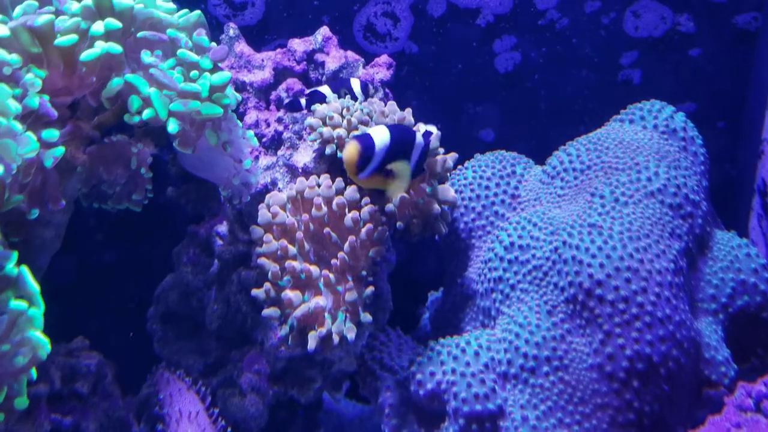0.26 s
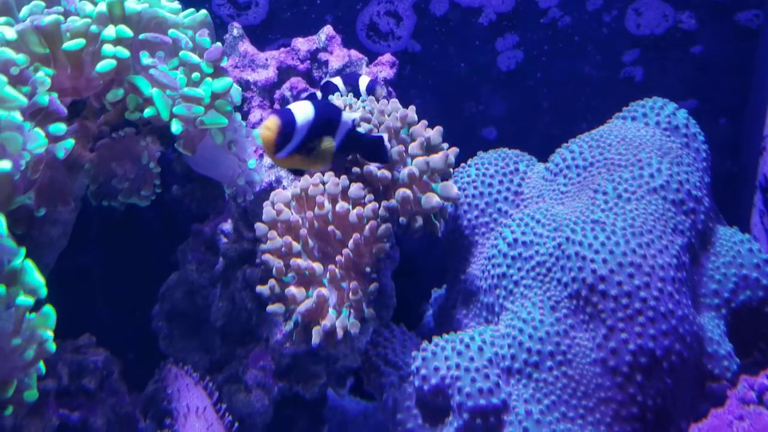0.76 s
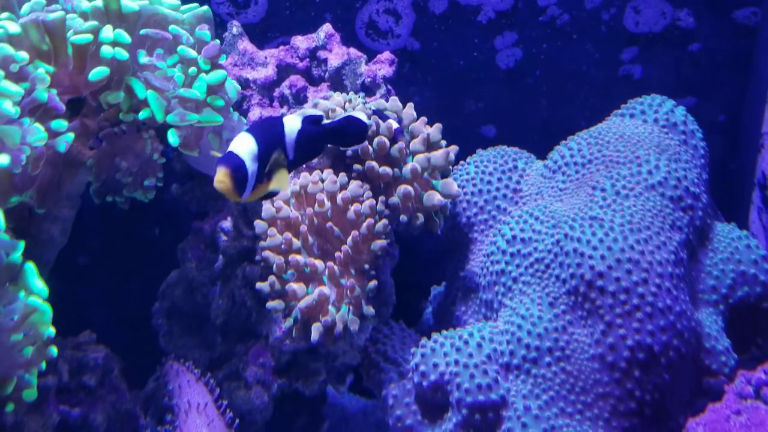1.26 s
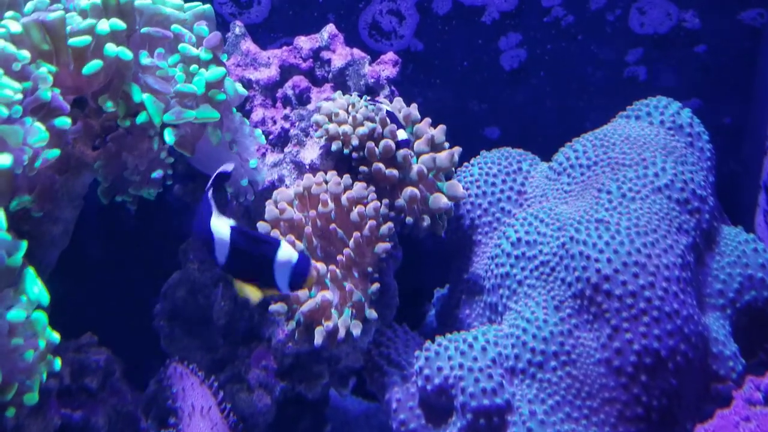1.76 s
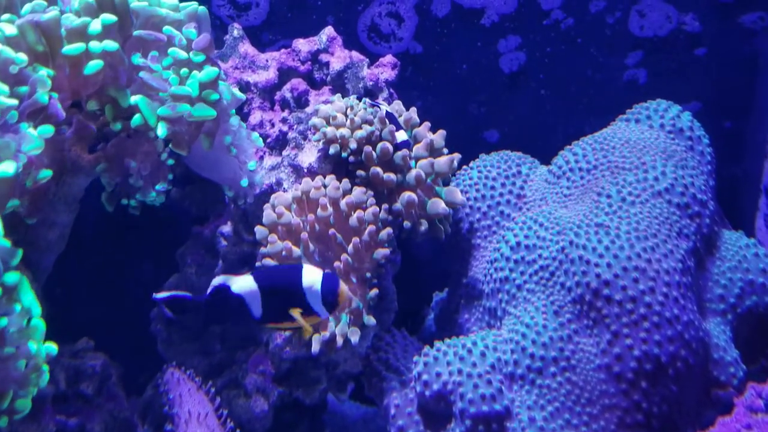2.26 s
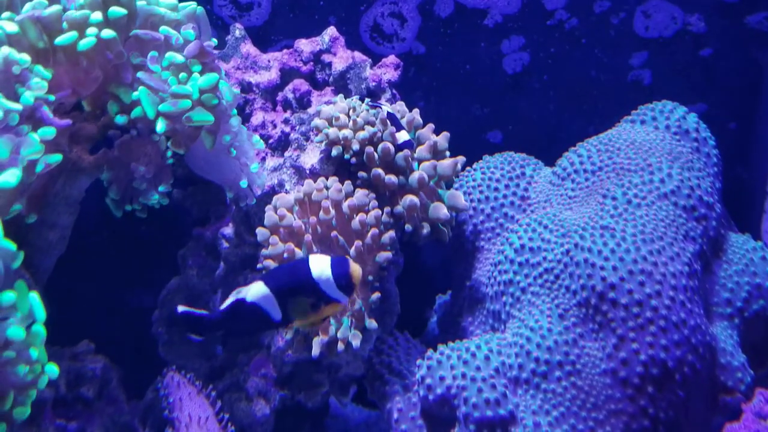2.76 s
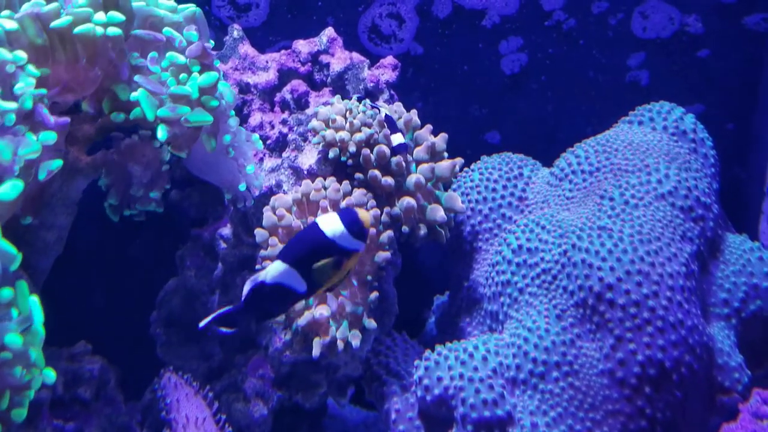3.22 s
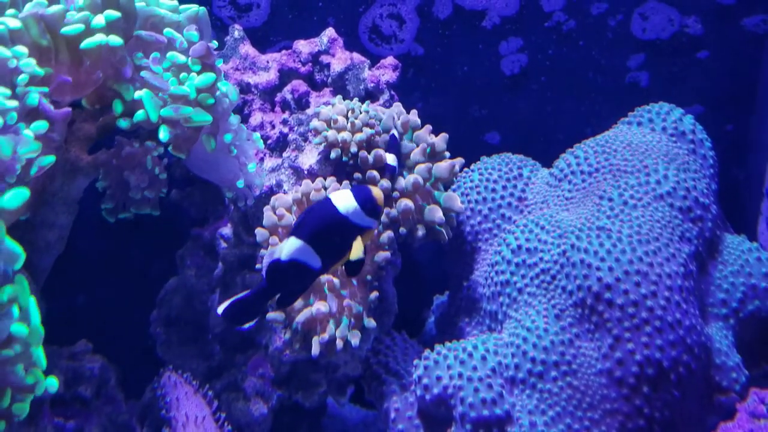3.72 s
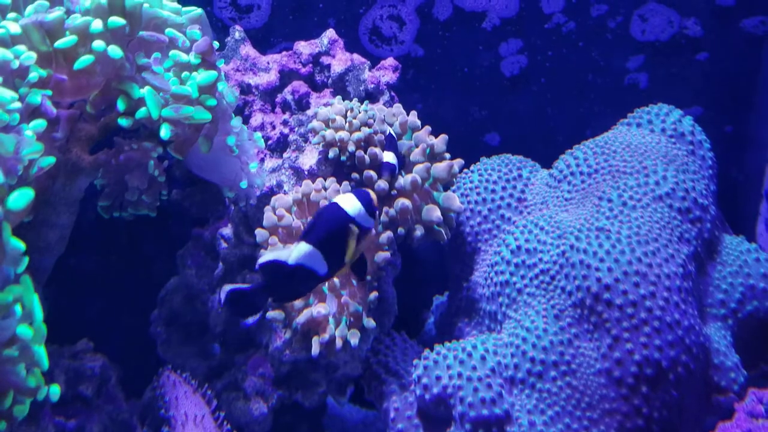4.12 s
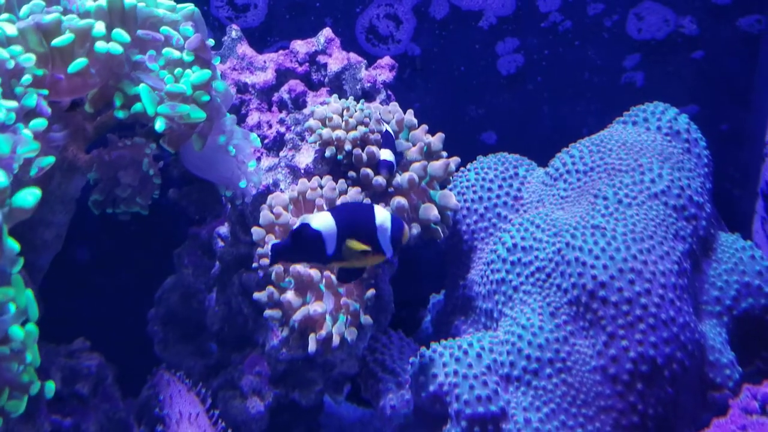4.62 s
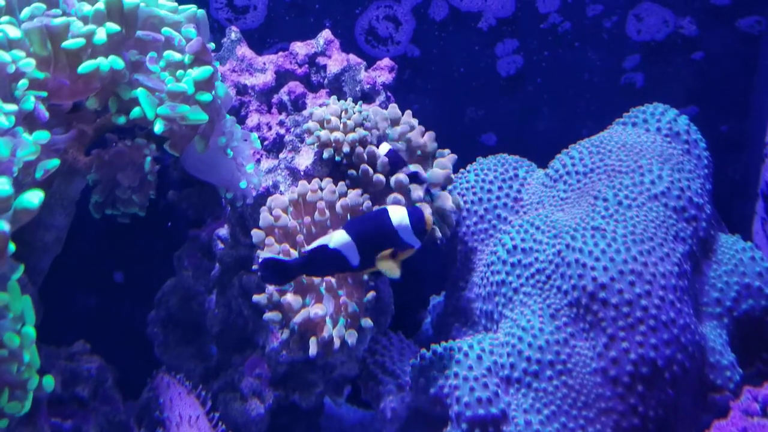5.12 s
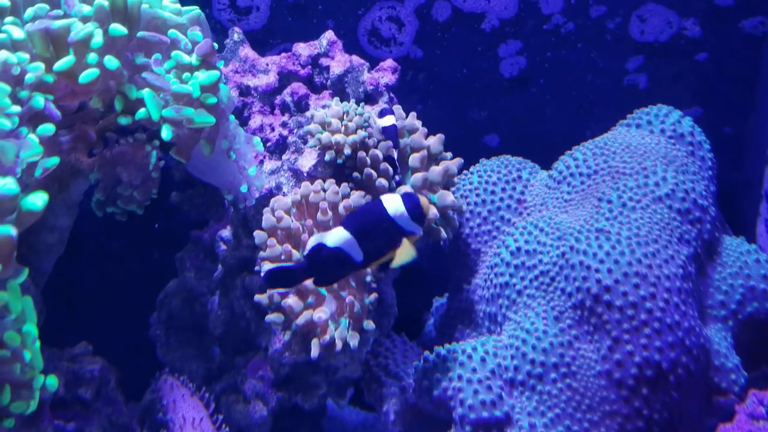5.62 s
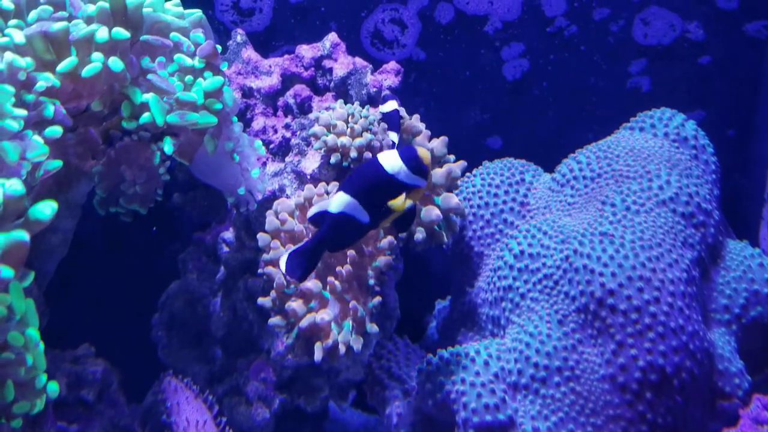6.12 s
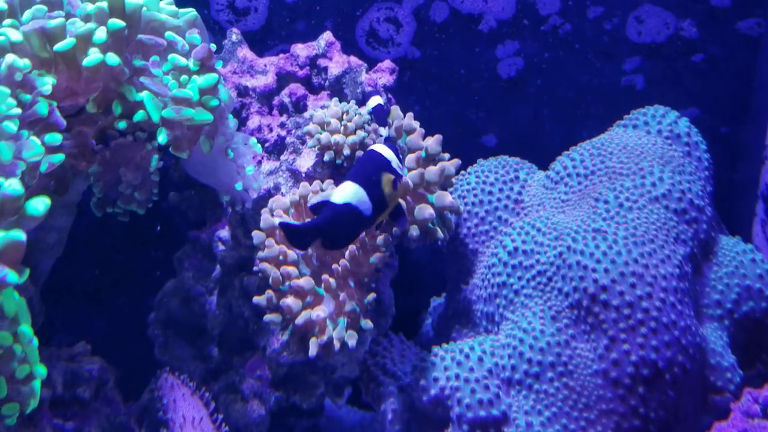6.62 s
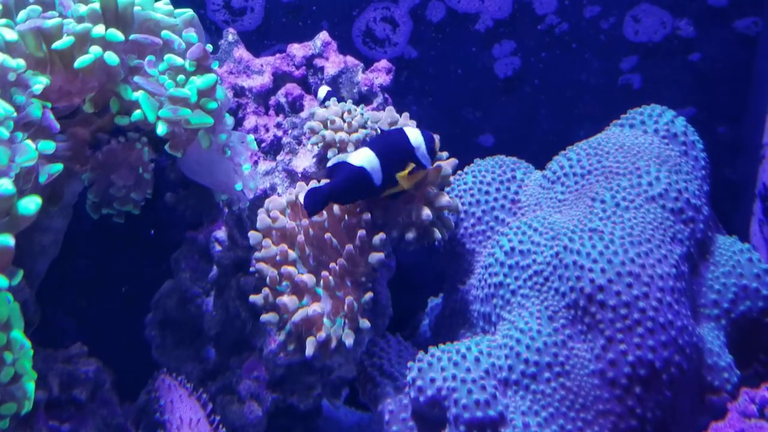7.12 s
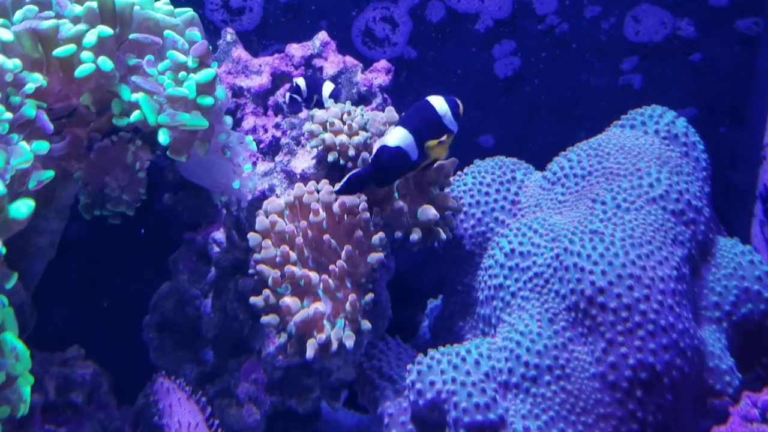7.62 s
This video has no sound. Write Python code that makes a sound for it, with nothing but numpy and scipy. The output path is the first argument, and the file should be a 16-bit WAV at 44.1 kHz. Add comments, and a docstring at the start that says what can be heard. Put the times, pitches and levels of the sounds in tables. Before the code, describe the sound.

From 0 to about 7.9 seconds, a home aquarium is heard quietly and closely from just outside the glass. A deep pump hum, around 60 and 120 Hz, holds steady, its lowest tone slowly beating about every two seconds. Water rushes evenly through an overflow, a hollow, resonant trickling noise with gentle low swells. A loose impeller rattles in soft, short ticks around 2.7 kHz, uneven in strength, with a stronger one near 2.4. Tiny bubbles fizz and snap in very high, brief rings; pops are most prominent from 2.4 to 3.8, notably near 2.45, 2.8 and 3.5. At 4.0 the hum skips with a tiny click, and the fizz thins before continuing moderately to the end. Pump and bubbles lie left, with short room reflections and faint microphone hiss. Swimming fish make no sound.

```python
"""Home aquarium, close at the glass

Heard from just outside the glass, the machinery off to the left of a two-port microphone.
Mains pumps hum through the cabinet as steady tones, with a slow beat in the one near 60 Hz. Once the
recorder skips a moment: the hum's phase jumps, with a small click. Water rushes through the overflow:
noise coloured by resonances, with gentle swells in its lower part. An impeller rattles once a turn in
short damped rings, each with a tail of the room. Small bubbles burst at the surface in quick high rings,
followed by echoes and a short tail of the room."""
import sys
import numpy as np
from scipy import signal
from scipy.fft import rfft, irfft, next_fast_len
from scipy.io import wavfile
from scipy.ndimage import uniform_filter1d

SR = 44100
rng = np.random.default_rng(int(sys.argv[2]) if len(sys.argv) > 2 else 0)


def gain_from_decibels(decibels):
    """Convert decibel values to linear amplitude factors."""
    exponent = np.asarray(decibels, float) / 20
    return 10 ** exponent


def store_pcm(level_fs):
    """Save levels as 16-bit WAV."""
    pcm = np.round(np.clip(level_fs, -1, 1) * 32767).astype(np.int16)
    wavfile.write(sys.argv[1], SR, np.atleast_2d(pcm).T)


N = 347067  # samples

# Steady pump and shaft tones: multiple of mains, left rms level/dB, right rms level/dB
HUM_TONES = [(0.53, -78, -95), (0.616, -82, -94), (2, -39.5, -45), (4, -53.5, -65), (6, -63.5, -71.5),
             (14, -65, -88), (19, -64.5, -94), (32, -70.5, -94), (34, -68, -86)]
# Spectrum of the rush of water and air before scaling: f/Hz, relative density level/dB
RUSH_SPECTRUM = [(15, -67), (25, -27.5), (70, -9), (123, -6), (290, -18.5), (617, -17), (900, -21),
                 (1420, -26), (2310, -27.5), (2720, -21.5), (3860, -31.5), (6980, -44.5), (8660, -48),
                 (12600, -33.5), (15700, -44.5)]
# Resonances of cabinet, room and microphone that colour the rush: f/Hz, width/Hz, boost level/dB
RESONANCES = [(97.6, 3.3, 8.5), (156, 4, 3), (161, 25.5, 6.5), (201, 27.5, 6), (244, 18, 2.5),
              (323.5, 9.1, 6), (376.5, 8.3, 10.5), (427, 5.4, 7.5), (461.7, 7.4, 3), (521, 10, 4),
              (602.4, 49, 7.5), (695, 57, 6.5), (800, 15, 2.5), (844, 5, 2.5), (1047, 22, 7.5),
              (1160, 250, 4.5), (1722, 304, 6.5), (2670, 210, 1), (6950, 2500, 11), (12000, 8900, 1),
              (13000, 1300, 4.5)]
# Balance of the ports: f/Hz, left minus right level/dB
PORT_BALANCE = [(40, -13), (120, 6), (250, 0.5), (400, 6.5), (700, 7), (1200, 6), (1700, 10), (2300, 8),
                (2750, 13.5), (3800, 8.5), (5500, 5), (7000, 14.5), (9000, 12.5), (12500, 14), (15500, 15)]
# Likeness of the rush at the two ports: f/Hz, share common to both (0-1)
PORT_LIKENESS = [(60, 0.99), (130, 0.83), (290, 0.85), (640, 0.82), (1200, 0.21), (2700, 0.45), (5000, 0.6),
                 (9000, 0)]
# Phase of the rush between the ports: f/Hz, lead of the left/rad
LEFT_LEAD = [(60, -1.8), (120, 0.14), (600, 0.86), (860, -2), (2070, -4), (2670, -8.5), (3530, -11)]
# Modes of the pump housing: ratio to knock pitch, level/dB added to the knock
HOUSING_MODES = [(0.9875, -1), (1.16, -12.5), (0.912, -6.5)]
# Loudest knocks of the impeller: t/s, peak level/dB before housing modes and port gains
LOUD_KNOCKS = [(0.055, -43), (0.4514, -50), (0.4677, -47), (0.7, -46.5), (0.8675, -45), (0.9507, -49),
               (0.982, -44.5), (1.0345, -46.5), (1.1503, -45), (1.35, -47.5), (1.449, -44), (1.501, -43.5),
               (1.642, -44), (1.816, -47.5), (2.1176, -46), (2.382, -41), (2.5838, -51), (2.816, -44.5),
               (2.8997, -47.5), (2.9442, -52), (3.683, -46), (4.0595, -43), (4.2946, -53), (4.5765, -44),
               (4.6764, -43), (4.7433, -49), (4.8603, -48), (4.9611, -48), (5.011, -42), (5.1097, -47),
               (5.2423, -46), (5.2928, -48), (5.6446, -54), (5.661, -44), (5.7102, -46), (5.7443, -47),
               (6.0004, -49), (6.093, -44.5), (6.127, -44.5), (6.2776, -48), (6.61, -48), (6.66, -47),
               (6.8917, -45.5), (6.9423, -44.5), (7.0263, -46)]
# Loudest bursting bubbles: t/s, peak level/dB before port gains, f/Hz before scatter
LOUD_POPS = [(0.279, -43, 12000), (0.473, -45.5, 6840), (0.5926, -44.5, 7500), (0.6975, -48, 6870),
             (0.7881, -49, 6950), (0.9676, -44.5, 6350), (1.3834, -43, 11700), (1.5933, -43, 13400),
             (1.6856, -46, 12000), (1.9557, -49, 6200), (1.991, -47.5, 6900), (2.284, -47, 12200),
             (2.312, -51.5, 6800), (2.424, -50, 6700), (2.4415, -39.5, 7150), (2.453, -39, 13100),
             (2.5731, -50, 6900), (2.624, -38.5, 11060), (2.7671, -50, 6990), (2.7801, -34, 12200),
             (2.9951, -45, 11900), (3.0131, -44, 13100), (3.0616, -38, 12000), (3.1303, -49, 12100),
             (3.176, -48, 7700), (3.263, -50, 4200), (3.427, -42, 12600), (3.4705, -42, 13200),
             (3.485, -36.5, 12600), (3.641, -39, 13500), (3.7184, -44, 9900), (3.7594, -47, 12000),
             (3.855, -47.5, 4460), (4.0821, -51, 6860), (4.3939, -54, 5260), (4.5755, -51, 4600),
             (4.6902, -51, 6260), (4.7167, -54, 4750), (4.7465, -42.5, 6800), (5.1577, -44, 11700),
             (5.2405, -46, 13200), (5.4281, -54, 5240), (5.662, -54, 4720), (5.6665, -45.5, 6160),
             (5.868, -45, 7140), (5.902, -45, 12200), (6.2262, -47, 6700), (6.35, -47, 12700),
             (6.3999, -55, 4800), (6.4393, -52, 6640), (6.4574, -46.5, 8100), (6.7555, -48, 6900),
             (7.234, -54, 4900), (7.2534, -44, 13100), (7.2725, -45.5, 7350), (7.3981, -44, 12500),
             (7.4235, -44, 12000), (7.4592, -44.5, 4200), (7.5288, -42, 12300)]
# Echoes of a burst from glass and wall: t/s (direct sound at 0.0015), level/dB before port gains
BURST_ECHOES = [(.0068, -9), (.0150, -9), (.0225, -14)]
# How busily the surface fizzes: t/s, level/dB added to the faint bubbles
FIZZ_COURSE = [(0, -2), (1, 4), (1.5, 2), (2, 4.5), (2.5, 9), (3.1, 5), (3.75, 11), (4, 1), (5, 3),
               (5.5, 6), (6.2, 5.5), (7, 5), (7.4, 5), (7.87, 7)]

MAINS_HZ, MAINS_START_TURNS = 60.02, .98
SKIP_S, SKIP_TURNS, CLICK_PEAK_DB = 4.012, -.58, -38
# rms levels of the tone at mains speed and the shaft turning just below it, before flutter
MAINS_TONE_DB, SHAFT_DB, SHAFT_SLIP_HZ, IN_STEP_S = -49.5, -53, 0.518, 3.78
FLUTTER_DB, FLUTTER_COUNT = 1.8, 60  # spread; random steps over the scene
RUSH_LEFT_RMS_DB = -41.5  # before the surges
KNOCK_HZ, KNOCK_SCATTER = 2747, .035  # scatter as a share of the pitch
# Knocks and bursts are levelled midway between the ports; the near, left port hears more
LEFT_OVER_MIDDLE_DB = 9.5
LEFT_LAG_S, RIGHT_SHADOW_DB = 0.00043, -9  # shadow on direct sound and echoes, before the balance
TAIL_T60_S, BUBBLE_TAIL_GAIN_DB, KNOCK_TAIL_GAIN_DB = .17, -30.5, -27
HISS_GAIN_DB, TOP_HZ = -77, 15680


def on_log(hz, table):
    """A (Hz, value) table read on a logarithmic frequency axis."""
    f, v = np.transpose(table)
    return np.interp(np.log(np.maximum(hz, 1)), np.log(f), v)


def colour(x, gain):
    """Filter by a gain given as a function of frequency."""
    size = next_fast_len(N)
    hz = np.arange(size // 2 + 1) * SR / size
    return irfft(rfft(x, size) * gain(hz), size)[..., :N]


def rings(s, db, hz, t60, rise, glide):
    """Short decaying tones that swell for an instant and may glide up."""
    t = np.arange(1024) / SR
    t60 = np.broadcast_to(t60, np.shape(hz))[:, None]
    shape = (1 - np.exp(-t / rise)) ** 2 * np.exp(-np.log(1000) * t / t60)
    shape = shape / shape.max(axis=1, keepdims=True)
    cycles = hz[:, None] * t * (1 + glide * np.minimum(t / t60, 1))
    waves = gain_from_decibels(db)[:, None] * shape * np.sin(2 * np.pi * cycles)
    at = np.clip(s * SR, 0, N).astype(int)[:, None] + np.arange(len(t))
    return np.bincount(at.ravel(), waves.ravel(), N + 2048)[:N]


def ports(x, tail_gain_db, echoes, shade_db):
    """A near sound at both ports: direct, echoes and a bright diffuse tail that differs left and right."""
    t = np.arange(SR // 4) / SR
    bright_noise = np.diff(rng.standard_normal((2, len(t) + 1)))
    decay = np.exp(-np.log(1000) * t / TAIL_T60_S)
    room = gain_from_decibels(tail_gain_db) * bright_noise * decay * np.minimum(t / .003, 1)
    for s, db in [(0.0015, 0.027), *echoes]:  # direct sound first
        room[0, int((s + LEFT_LAG_S) * SR)] += gain_from_decibels(db)
        room[1, int(s * SR)] += gain_from_decibels(db + RIGHT_SHADOW_DB)
    heard = gain_from_decibels(LEFT_OVER_MIDDLE_DB) * signal.fftconvolve(x[None], room, axes=1)[:, :N]
    heard[1] = colour(heard[1], lambda hz: gain_from_decibels(shade_db - on_log(hz, PORT_BALANCE)))
    return heard


def microphone_hiss():
    """Self-noise of the two ports: twice-differenced white noise, rising towards the top."""
    return gain_from_decibels(HISS_GAIN_DB) * np.diff(rng.standard_normal((2, N + 2)), 2) / 2


def mains_turns():
    """Mains cycles elapsed, with one jump of phase where the recorder skips a moment."""
    t = np.arange(N) / SR
    return MAINS_START_TURNS + MAINS_HZ * t + SKIP_TURNS * (t > SKIP_S)


def skip_click():
    """A tiny damped ring, equal at both ports, where the recorder skips a moment."""
    return rings(np.array([SKIP_S]), np.array([CLICK_PEAK_DB]), np.array([3000.]), 0.00066, .0001, 0)


def beat(turns):
    """Mains tone and slightly slower shaft reinforce and oppose each other about every two seconds."""
    t = np.arange(N) / SR
    steps = rng.standard_normal(FLUTTER_COUNT)
    flutter = gain_from_decibels(FLUTTER_DB * np.interp(t, np.linspace(0, N / SR, FLUTTER_COUNT), steps))
    shaft = gain_from_decibels(SHAFT_DB) * np.exp(-2j * np.pi * SHAFT_SLIP_HZ * (t - IN_STEP_S))
    pair = gain_from_decibels(MAINS_TONE_DB) + shaft
    tone = np.sqrt(2) * flutter * pair * np.exp(2j * np.pi * turns)
    return np.array([tone, gain_from_decibels(-4.5) * tone * np.exp(-.19j)]).imag  # right softer and later


def hum(turns):
    """The beating pair plus steady tones tied to the mains; the right port hears them a little late."""
    out = beat(turns)
    for multiple, left_db, right_db in HUM_TONES:
        angle = 2 * np.pi * (multiple * turns + rng.random())
        left = gain_from_decibels(left_db) * np.sin(angle)
        right = gain_from_decibels(right_db) * np.sin(angle - 0.14 * min(multiple, 3))
        out = out + np.sqrt(2) * np.array([left, right])
    return out


def rush():
    """Even noise in resonances of cabinet, room and microphone, most alike at the ports in the bass."""
    def tone(hz):
        boost_db = sum(db / (1 + (2 * (hz - f) / w) ** 2) for f, w, db in RESONANCES)
        return gain_from_decibels(on_log(hz, RUSH_SPECTRUM) + boost_db)

    def like(hz):
        return np.clip(on_log(hz, PORT_LIKENESS), 0, 1)

    left, separate = rng.standard_normal((2, N))
    shared = colour(left, lambda hz: like(hz) * np.exp(-1j * on_log(hz, LEFT_LEAD)))
    right = shared + colour(separate, lambda hz: np.sqrt(1 - like(hz) ** 2))
    right = colour(right, lambda hz: gain_from_decibels(-on_log(hz, PORT_BALANCE)))
    both = colour(np.array([left, right]), tone)
    return both * gain_from_decibels(RUSH_LEFT_RMS_DB) / both[0].std()


def surge(x):
    """The flow is not quite even: each octave of the lower rush swells and sinks on its own."""
    out = x
    for centre_hz in [173, 342, 716, 1480]:
        band = colour(x, lambda hz: np.exp(-(np.log2(np.maximum(hz, 1) / centre_hz) / .5) ** 2))
        steps = rng.standard_normal(size=26)
        swell_db = 1.43 * np.interp(np.arange(N), np.linspace(0, N, len(steps)), steps)
        out = out + (gain_from_decibels(swell_db) - 1) * band
    return out


def impeller(turns):
    """The loose rotor knocks its housing each mains cycle, cushioned by water; the force comes in runs."""
    s = np.flatnonzero(np.diff(np.floor(turns)) > 0) / SR
    jitter, force, mood, pitch = rng.standard_normal((len(s), 4)).T
    force_db = 8.0 * force + 5 * uniform_filter1d(mood, size=5)
    loud_s, loud_db = np.transpose(LOUD_KNOCKS)
    s = np.r_[s + .001 * jitter, loud_s - .0015]  # allow for the path to the ports
    db = np.r_[np.minimum(-57 + force_db, -47), loud_db]
    hz = KNOCK_HZ * (1 + KNOCK_SCATTER * np.r_[pitch, rng.standard_normal(len(loud_s))])
    t60_s, rise_s = .009, .003
    knocks = sum(rings(s, db + mode_db, hz * ratio, t60_s, rise_s, 0) for ratio, mode_db in HOUSING_MODES)
    return ports(knocks, KNOCK_TAIL_GAIN_DB, [], -0.55)


def bursts(s, db, hz, cycles):
    """A film tears in three quick snaps; high bubbles scatter most in pitch and ring fewer cycles."""
    late, detune = rng.random((len(s), 2, 3)).transpose(1, 2, 0)
    late[0] = 0
    hz = hz * (1 + .15 * (hz / 12000) ** 2 * (detune - .5))
    db = db - 3 * np.arange(3)[:, None]  # the first snap is loudest, the other two softer, in either order
    s, db, hz = (s + .0025 * late).ravel(), db.ravel(), hz.ravel()
    t60_s = cycles / hz * (9000 / hz) ** 1.3  # the full cycle count holds at 9 kHz
    return rings(s, db, hz, t60_s, .0002, .02)


def bubbles():
    """Bursting bubbles ring briefly, the smaller the higher; many faint ones fizz between the loud."""
    when, size, small, pitch = rng.random((1200, 4)).T
    # most are tiny; fewer are about twice as wide
    hz = np.where(small < .78, 11300 * 1.2 ** pitch, 5000 * 1.55 ** pitch)
    when_s = when * N / SR
    busy_db = np.interp(when_s, *np.transpose(FIZZ_COURSE))
    db = np.minimum(-64 - 4 * np.log(1 - size) + busy_db, -52)
    fizz = bursts(when_s, db, hz, 14.4)
    loud_s, loud_db, loud_hz = np.transpose(LOUD_POPS)
    pops = bursts(loud_s - LEFT_LAG_S, loud_db, loud_hz, 23.0)
    return ports(fizz + pops, BUBBLE_TAIL_GAIN_DB, BURST_ECHOES, -1.4)


def scene():
    """Hum, click, rush, rotor knocks and bubbles at the two ports."""
    turns = mains_turns()
    return hum(turns) + skip_click() + surge(rush()) + impeller(turns) + bubbles()


def roll_off(x):
    """The treble ends steeply here."""
    return signal.sosfilt(signal.butter(12, 15810, fs=SR, output="sos"), x)


def record(dry):
    """The microphone adds its own hiss; a steep elliptic low-pass cuts the top."""
    low_pass = signal.ellip(10, .2, 70, TOP_HZ, fs=SR, output="sos")
    mix = signal.sosfilt(low_pass, dry + microphone_hiss())
    return roll_off(mix)


dry = scene()
out = record(dry)
store_pcm(out)
```